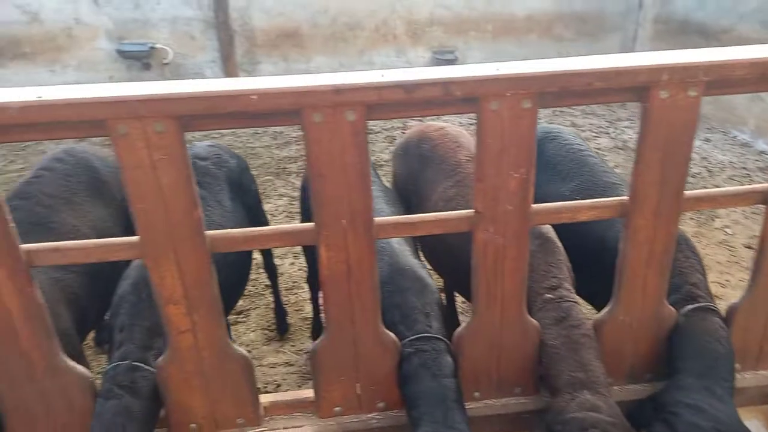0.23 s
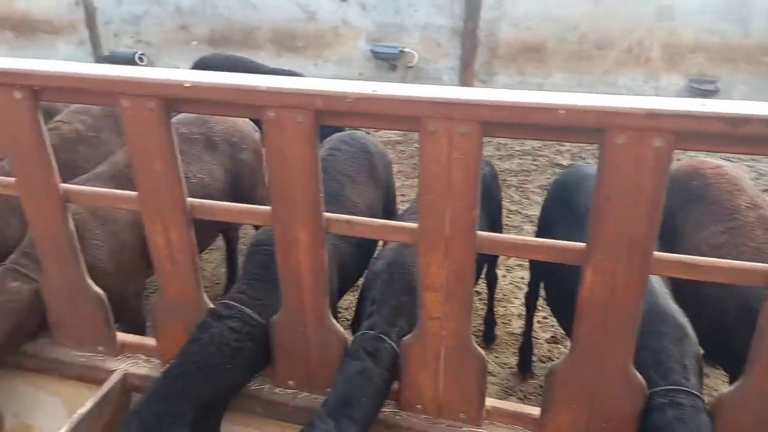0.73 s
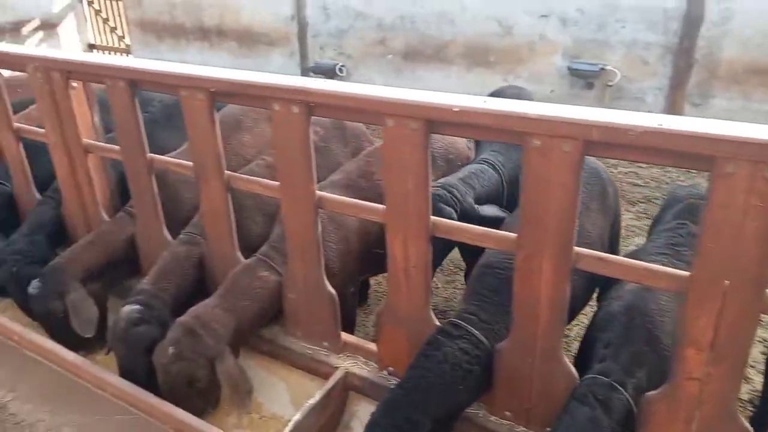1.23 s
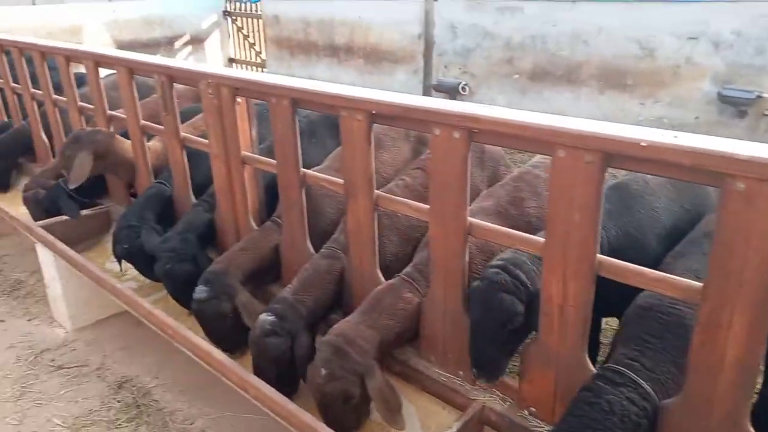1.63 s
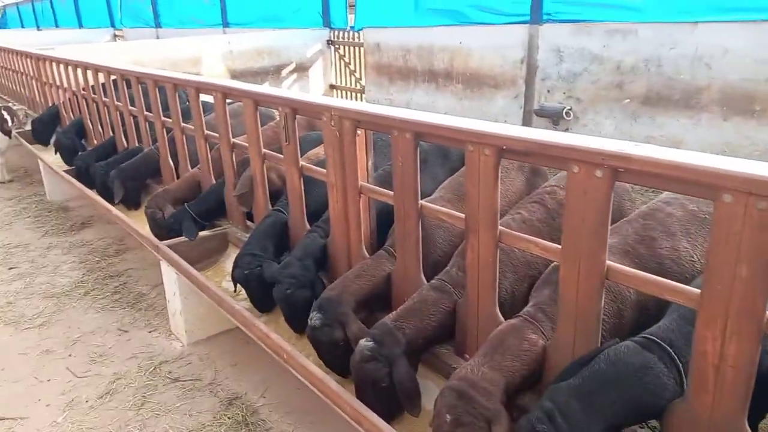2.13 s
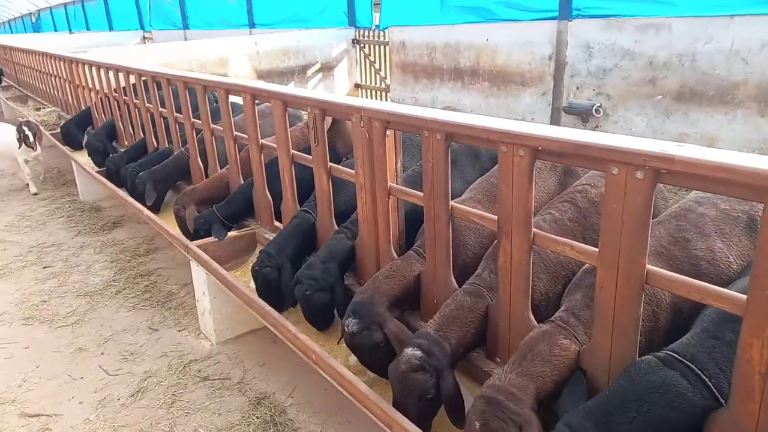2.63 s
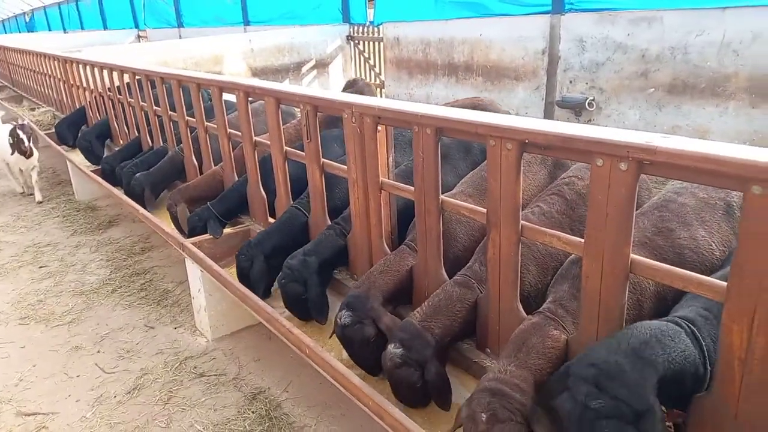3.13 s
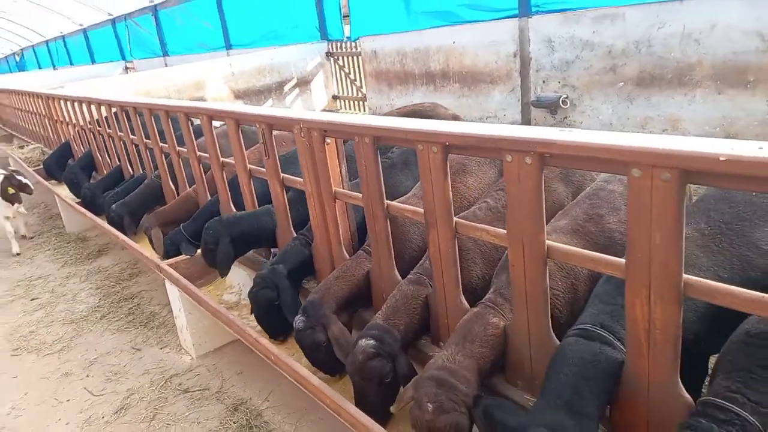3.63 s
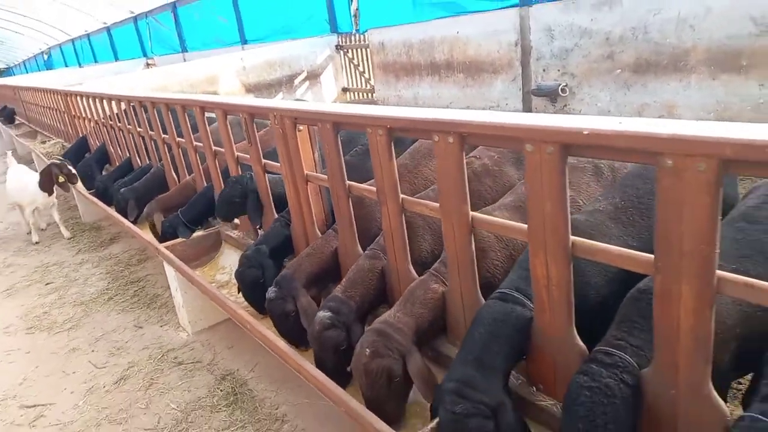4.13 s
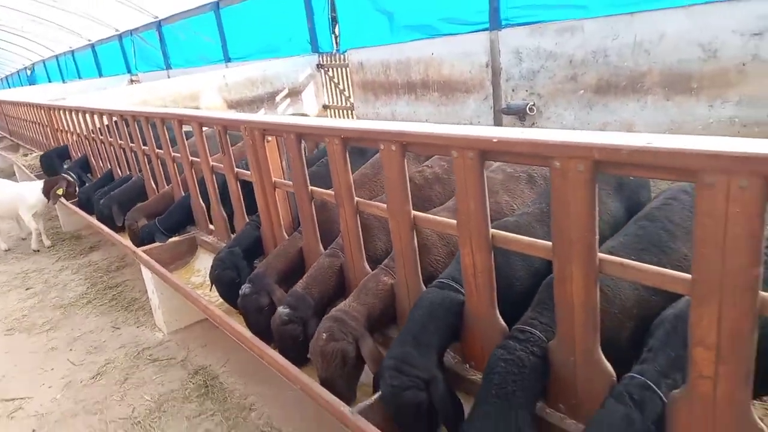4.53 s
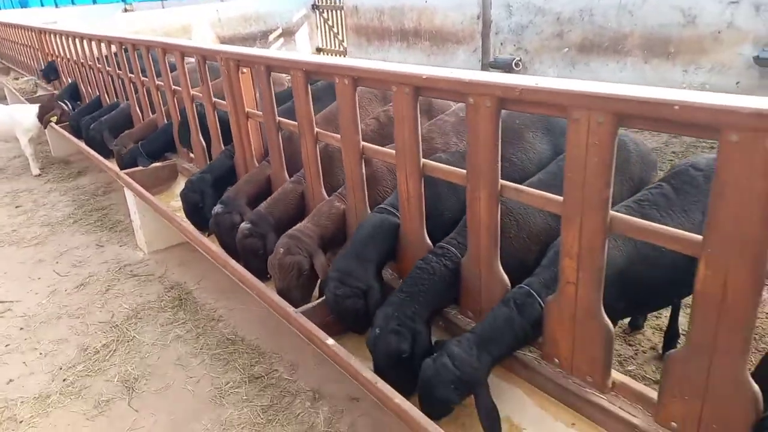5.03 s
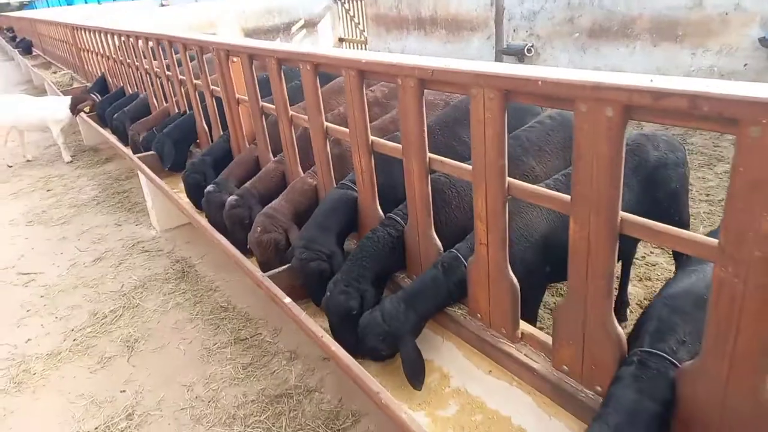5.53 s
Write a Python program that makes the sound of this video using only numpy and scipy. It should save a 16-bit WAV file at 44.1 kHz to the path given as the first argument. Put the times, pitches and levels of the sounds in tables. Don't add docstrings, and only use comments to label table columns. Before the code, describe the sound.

Feeding sheep in a shed: one strong rough bleat up close, softer higher bleats around it, birds chirping, planks knocking, hay rustling.

```python
import sys
import numpy as np
from scipy import signal
from scipy.fft import rfft, irfft
from scipy.io import wavfile
from scipy.ndimage import uniform_filter1d, map_coordinates

SR = 44100
rng = np.random.default_rng(int(sys.argv[2]) if len(sys.argv) > 2 else 0)


def to_linear_factor(level_db):
    exponent = np.asarray(level_db, float) / 20
    return 10 ** exponent


def generate_wav(signal):
    frames = np.transpose(np.atleast_2d(signal))
    scaled = np.clip(frames, -1, 1) * 32767
    pcm = np.round(scaled).astype(np.int16)
    wavfile.write(sys.argv[1], SR, pcm)


N = 254456


def unit(x):
    return x / np.sqrt(np.mean(x ** 2) + 1e-30)


def power_sum(*gains):
    return 10 * np.log10(sum(np.square(g) for g in gains))


def colour(x, table):
    hz, db = np.transpose(table)
    f = np.maximum(np.fft.rfftfreq(4096, 1 / SR), 1)
    cep = irfft(np.interp(np.log(f), np.log(hz), db) * np.log(10) / 20)
    cep[1:2048] *= 2
    cep[2049:] = 0
    response = irfft(np.exp(rfft(cep)))[:2048]
    return signal.fftconvolve(x, response)[:len(x)]


def band(x, lo_hz, hi_hz):
    return signal.sosfilt(signal.butter(3, [lo_hz, hi_hz], "band", fs=SR, output="sos"), x)


def split(x, edge_hz, kind="low"):
    return signal.sosfiltfilt(signal.butter(2, edge_hz, kind, fs=SR, output="sos"), x)


def walk(rate_hz, size):
    k = max(int(SR / rate_hz), 1)
    held = np.repeat(rng.standard_normal(size // k + 1), k)[:size]
    return 1.3 * uniform_filter1d(uniform_filter1d(held, k), k)


def read(table):
    s, *columns = np.transpose(table)
    i = np.arange(int(s[0] * SR), min(int(s[-1] * SR), N))
    after = i - i[0] + (i[0] == 0) * SR
    left = i[-1] - i + (i[-1] > N - 99) * SR
    fade = np.clip(np.minimum(after, left) / (.015 * SR), 0, 1)
    return i[0], [np.interp(i / SR, s, c) for c in columns], fade


def add(out, start, x, lag, pan_db, shade_db=0., turn_db=0.):
    x = np.pad(x, (0, 512))
    f = np.fft.rfftfreq(len(x), 1 / SR)
    shade = np.exp(-np.log(np.maximum(f, 1) / 1750) ** 2 / .3)
    tilt = to_linear_factor((pan_db + shade_db * shade) / 2)
    ports = rfft(x) * np.array([tilt, np.exp(-2j * np.pi * f * lag / SR) / tilt])
    heard = irfft(ports, len(x)) * to_linear_factor(np.outer([.5, -.5], turn_db))
    out[:, start:start + len(x)] += heard[:, :N - start]


def effort(call):
    _, _, db, chest_db = np.transpose(call)
    db = db + power_sum(0.96, to_linear_factor(chest_db))
    rough = np.minimum(.03 + .03 * (db.max() - db), .22)
    return np.column_stack([call, rough])


def burst(s, held_s, hz, db, chest_db, rough, attack_s, release_s, glide_hz_s):
    after = np.cumsum([0, attack_s, max(held_s - attack_s, .01), release_s])
    level_db = db + np.array([-12.0, 1.0, -9.5, -33.0])
    return np.transpose([s + after, hz + glide_hz_s * after, level_db, np.full(4, chest_db), np.full(4, rough)])


def voice(out, call, throat, lag, pan_db, shade_db, split_hz=1000, breath=.5, half_db=0., flutter_db=1.5,
          rasp=.8, tire=0., gape=0., wobble_db=.5, quaver_db=0., husk=0., mouth_db=0., jolts=(), turn=((0, 0),)):
    husk_hz, quaver_hz = 2900, 8.6
    under_lift, over_lift = 1.23, 2
    jolt_rest_db, jolt_takes = -3, .3
    start, (hz, db, chest_db, rough), fade = read(call)
    size = len(hz)
    late = np.clip(np.linspace(-7, 3, size), 0, 1)
    rough = np.clip(rough + tire * late, .035, 1)

    phase = np.cumsum(hz * (1 + .03 * rough * walk(150, size))) / SR
    cycles = np.arange(1, int(phase[-1]))
    at = np.interp(cycles, phase, np.arange(size))
    uneven_db = 8 * rough[at.astype(int)] * rng.standard_normal(len(at))
    strength = to_linear_factor(uneven_db + half_db * (cycles % 2))
    taps = np.clip(at.astype(int)[:, None] + np.arange(-7, 9), 0, size - 1)
    shape = strength[:, None] * np.sinc(taps - at[:, None]) * np.hanning(18)[1:-1]
    pulses = unit(np.bincount(taps.ravel(), shape.ravel(), size))

    air = unit(rng.standard_normal(size) * np.exp(-(phase % 1) / 0.4))
    pulses = pulses + husk * split(air - pulses, husk_hz, "high")
    scrape = band(rng.standard_normal(size), 1080, 11000)
    sound = colour(pulses + breath * rough * air + rasp * scrape, throat)
    sound = band(sound, 70, 7000)
    chest = split(sound, split_hz)
    mouth = unit(sound - chest)

    nasal = split(chest, [330, 470], "band")
    under = split(chest, [230, 310], "band")
    over = split(chest, [650, 900], "band")
    jaw = gape * np.clip(4 * late, 0, 1)
    chest = chest + jaw * (under_lift * under + over_lift * over - nasal)

    lips = split(mouth, 1850)
    teeth = split(mouth, 2400, "high")
    t = (start + np.arange(size + 512)) / SR
    jolt_db = jolt_rest_db * bool(jolts)
    for s, size_db, half_s in jolts:
        jolt_db = jolt_db + size_db * np.exp(-((t[:size] - s) / half_s) ** 2)
    parts = [(lips, -jolt_takes), (mouth - lips - teeth, 1), (teeth, 0)]
    mouth = sum(part * to_linear_factor(share * jolt_db + flutter_db * walk(55, size)) for part, share in parts)

    db = db + quaver_db * np.cos(2 * np.pi * quaver_hz * np.arange(size) / SR)
    chest = unit(chest) * to_linear_factor(chest_db + wobble_db * walk(31.6, size))
    add(out, start, chest * to_linear_factor(db) * fade, lag, pan_db, shade_db, np.interp(t, *np.transpose(turn)))
    add(out, start, mouth * to_linear_factor(db + mouth_db) * fade, lag, pan_db, shade_db)


# time in s, pitch in Hz, level in dB, chest against mouth in dB.
EWE_CALLS = [
    [(0.0, 146.4, -26.5, 0), (0.04, 146.3, -33, -4), (0.1, 141.7, -35.5, 1.5), (0.17, 141.2, -34.5, 2),
     (0.25, 134.6, -39.5, -3), (0.37, 130.6, -56.5, -28)],
    [(1.55, 126.7, -70, -13.5), (1.63, 128.1, -37.5, -17), (1.72, 135.9, -22.5, -8.5),
     (1.784, 143.5, -23, -1), (1.916, 148, -21.5, -4), (2.156, 142.2, -25, -3), (2.205, 138.4, -26, 4.5),
     (2.285, 132.9, -28, -4), (2.41, 128.2, -36.5, -17.5)],
]
# time in s, pitch in Hz, level in dB, chest against mouth in dB.
LAMB_CALLS = [
    [(0.7, 185, -72, 1.5), (0.79, 192.5, -68, 5.5), (0.846, 197.4, -58, 1), (0.96, 195.6, -43, -14),
     (1.05, 193.3, -43, -9), (1.115, 187.5, -44.5, -18), (1.26, 184.7, -48, -13), (1.39, 181, -58, -5),
     (1.5, 182, -70.5, -26)],
    [(2.38, 194.2, -37, -34), (2.5, 195.6, -40, -15.5), (2.66, 197.8, -43.5, -4), (2.77, 194.3, -42, -41),
     (2.93, 189.8, -45, -14.5), (3.09, 180.2, -48.5, -7.5), (3.21, 186.4, -60.5, -2.5),
     (3.46, 182.8, -75.5, -3)],
]
# start in s, hold in s, pitch in Hz, level in dB.
COUGHS = [
    (4.71, 0.14, 125, -35.5),
    (4.815, 0.07, 121.8, -35),
    (5.73, 0.077, 115, -41.5),
]
# start in s, hold in s, pitch in Hz, level in dB.
COUGH_GULPS = [
    (4.748, 0.033, 123.1, -56),
    (4.832, 0.046, 121.3, -51),
]
# start in s, hold in s, pitch in Hz, level in dB, chest in dB.
GULPS = [
    (2.288, 0.021, 132.3, -37, 11.5),
    (2.322, 0.015, 124.6, -42.5, 14.5),
    (2.385, 0.035, 128.8, -59, 7.5),
]
# start in s, hold in s, pitch in Hz, level in dB, chest in
# dB.
GRUNTS = [
    (1.55, 0.41, 121.5, -54, -7.5),
    (4.385, 0.16, 106.6, -67, -1),
    (4.552, 0.079, 124.7, -55.5, -7),
    (4.639, 0.069, 126, -51, -18),
    (5.149, 0.22, 96, -86, 25),
    (5.63, 0.31, 113.5, -57, -13),
]
# start in s, hold in s, pitch in Hz, level in dB, chest against mouth in dB.
FAR_LAMB = (4.5, 1.14, 192.5, -65.5, 0.5)
# frequency in Hz, gain in dB.
EWE_THROAT_FIRST = [(60, 0), (130, -15), (280, -5.5), (430, 7.5), (590, 15), (750, -6.5), (1000, -2.5),
                    (1180, -1.5), (1400, 0), (1720, -4.5), (2000, 8), (2200, 0), (2450, 1), (2750, -8.5),
                    (3000, -14.5), (4300, -11), (6700, -18), (7500, -65)]
EWE_THROAT = [(130, -15.5), (279, -18), (430, -6.5), (594, 4), (715, -23.5), (870, -20.5), (1100, -19),
              (1180, -17), (1310, -8), (1450, -2.5), (1600, -14), (1800, -14), (2020, -8.5), (2170, 2),
              (2320, -11), (2560, -8), (2800, -13.5), (3080, -22), (3480, -18.5), (4050, -28), (4450, -25),
              (4800, -20), (5250, -32.5), (6000, -23.5), (7300, -38.5)]
LAMB_THROAT_FIRST = [(150, -38), (380, -5.5), (580, 0.5), (760, -16), (960, -41.5), (1170, -25), (1340, 3),
                     (1550, 0.5), (1800, -25), (2200, 13), (2500, -2), (2750, 7.5), (3000, -10),
                     (3500, -2.5), (4600, -23), (7000, -27), (7600, -57)]
LAMB_THROAT = [(200, -54), (560, -25.5), (780, -3), (980, -16), (1200, -29), (1560, -1), (1800, -13),
               (2150, 0), (2500, -6), (2750, -16.5), (3300, -33.5), (4200, -37), (7000, -57), (7600, -74)]
COUGH_THROAT = [(300, -45), (470, -16), (610, 2), (780, -8), (1170, -16.5), (1560, -1), (1850, -11),
                (2040, -1), (2160, 3.5), (2300, -5), (2650, -9.5), (3290, -33), (6700, -54.5), (7500, -42)]
GRUNT_THROAT = [(60, 20), (120, 24), (260, 6.5), (400, -11), (700, -29), (1500, -44)]
# time in s, size in dB, half-length in s.
JOLTS = [(1.748, 5, .016), (1.804, 9, .012), (1.9, -8, .018), (1.942, 3, .022), (2.03, 6, .012),
         (2.075, 14, .02), (2.118, 1, .014), (2.152, 16, .01), (2.185, 6, .014), (2.24, 5, .014),
         (2.305, 18, .012)]
# time in s, left over right in dB.
HEAD_TURN = [(1.6, -13), (1.75, 0), (1.8, -3), (1.88, -1), (1.97, -0.5), (2.07, 1.5), (2.19, -2.5),
             (2.27, -2), (2.32, -2)]


def sheep():
    out = np.zeros((2, N))
    voice(out, effort(EWE_CALLS[0]), EWE_THROAT_FIRST, 13.1, 0.84, -8, half_db=-1.5, breath=1.2, rasp=.55,
          husk=.4, flutter_db=2, mouth_db=1)
    voice(out, effort(EWE_CALLS[1]), EWE_THROAT, 21, 1.5, -7, half_db=-.2, breath=1, rasp=.2, flutter_db=1,
          tire=.07, gape=.92, husk=.45, mouth_db=-3.5, jolts=JOLTS, turn=HEAD_TURN)
    for row in GULPS:
        call = burst(*row, .3, attack_s=.01, release_s=.03, glide_hz_s=-60)
        voice(out, call, EWE_THROAT, 21, 1.5, -7, split_hz=800)
    voice(out, effort(LAMB_CALLS[0]), LAMB_THROAT_FIRST, 22, -1.2, -4, breath=1.5, rasp=.2, flutter_db=1.4,
          wobble_db=3.5, tire=.2, husk=.4)
    voice(out, effort(LAMB_CALLS[1]), LAMB_THROAT, 9.5, -1.5, -5, rasp=.15, flutter_db=2, wobble_db=3,
          tire=.4, quaver_db=2.8)
    for row in COUGHS:
        call = burst(*row, -19, .27, attack_s=.036, release_s=.22, glide_hz_s=-20)
        voice(out, call, COUGH_THROAT, 12.4, -1.1, -4, breath=5, rasp=1.2, mouth_db=-2)
    for row in COUGH_GULPS:
        call = burst(*row, 10, .12, attack_s=.012, release_s=.05, glide_hz_s=-20)
        voice(out, call, COUGH_THROAT, 12.4, -1.1, -4, split_hz=800)
    call = burst(*FAR_LAMB, .55, attack_s=.12, release_s=.1, glide_hz_s=-8)
    voice(out, call, LAMB_THROAT, 9.5, -1.5, -5, breath=3, wobble_db=3)
    for row in GRUNTS:
        call = burst(*row, 0.26, attack_s=0.035, release_s=0.046, glide_hz_s=31.4)
        voice(out, call, GRUNT_THROAT, 18.0, -0.47, 0, split_hz=390)
    return out


# time in s, half-length in s, level in dB.
PUFFS = [(0.044, 0.28, -53), (0.714, 0.022, -69), (0.93, .1, -64.5), (1.09, 0.11, -67.5),
         (1.308, .08, -64.5), (1.613, 0.12, -59), (2.57, 0.28, -71), (3.063, 0.12, -59),
         (3.388, 0.074, -66.5), (3.589, 0.1, -60.5), (3.933, 0.27, -65.5), (4.19, 0.063, -67),
         (4.358, 0.068, -62.5), (4.746, 0.1, -65.5), (4.918, 0.14, -56), (5.25, 0.062, -63.5),
         (5.442, 0.044, -63.5), (5.693, 0.13, -62.5)]


def puffs():
    t = np.arange(N) / SR
    swells = [to_linear_factor(db) * np.exp(-((t - s) / half_s) ** 2) for s, half_s, db in PUFFS]
    return np.sqrt(sum(np.square(swell) for swell in swells))


# time in s, level over usual in dB.
RUSTLE_LEVEL = [(0, 77), (0.371, -13), (.62, -18), (.72, -4), (1.1, -6.5), (1.48, -9), (2.6, -8), (3.358, -12),
                (3.66, -6), (4.129, -13), (4.64, -0.5), (5.03, -5), (5.62, -13.5), (5.77, 57)]
# frequency in Hz, density in dB per Hz.
RUSTLE = [(18, -105), (30, -62.5), (64, -10.5), (204, -18), (250, -14), (361, -16), (560, -21.5),
          (783, -22), (1260, -25.5), (1420, -14), (2340, -13), (2940, -19.5), (7000, -26), (9100, -101.5),
          (15400, -120)]
# usual level in dB, share of the level curve, level under a bleat in dB, pan in dB.
HERD_PARTS = [
    (-59.5, 0.91, -27.5, -0.1),
    (-64, 0.18, -5, -9),
    (-67.5, 0.013, -15.5, -0.4),
]
HERD_EDGES_HZ = [1250, 3000]
HERD_TOP_DB = [-56, -57, -58]


def herd(loud):
    swing_db = np.interp(np.arange(N) / SR, *np.transpose(RUSTLE_LEVEL))
    parts = np.zeros((3, 2, N))
    mid, side = (colour(rng.standard_normal(N), RUSTLE) for _ in range(2))
    for hz in 35 * 2 ** np.arange(0, 7.8, 1 / 3):
        lo_hz, hi_hz = hz / 2 ** (1 / 6), hz * 2 ** (1 / 6)
        apart = np.clip(hz / 2200, .4, 1)
        depth_db = np.clip(3 - hz / 1500, .8, 3)
        flicker = to_linear_factor(depth_db * (.6 * walk(4, N) + .8 * walk(14, N)))
        ports = band(mid, lo_hz, hi_hz) + apart * band(side, lo_hz, hi_hz) * np.array([[1], [-1]])
        parts[np.searchsorted(HERD_EDGES_HZ, hz)] += flicker * ports
    out = np.zeros((2, N))
    chaff = [0, 0, to_linear_factor(-2.5) * puffs()]
    for part, row, top_db, puff in zip(parts, HERD_PARTS, HERD_TOP_DB, chaff):
        db, share, under_db, pan_db = row
        db = np.minimum(power_sum(to_linear_factor(db + share * swing_db), loud * to_linear_factor(under_db), puff), top_db)
        out += part / np.std(part.mean(axis=0)) * to_linear_factor(db + np.array([[pan_db], [-pan_db]]) / 2)
    return out


# frequency in Hz, density in dB per Hz.
HISS_COLOUR = [(6800, -3), (7300, -3), (8300, -1), (10000, 2), (12000, 3.5), (14000, -0.5), (15500, -1.5)]


def hiss(loud):
    rest_db, breath_db = -70, -32
    db = power_sum(to_linear_factor(rest_db), puffs(), loud * to_linear_factor(breath_db))
    db = db + 2.4 * walk(9.8, N) + 2.0 * walk(35, N)
    return np.array([unit(colour(rng.standard_normal(N), HISS_COLOUR)) * to_linear_factor(db + pan_db) for pan_db in (-.8, .8)])


def note(s, slide_s, from_hz, to_hz, db, held_s):
    edge_db = -6
    return [(s, from_hz, db + edge_db),
            (s + .4 * slide_s, from_hz + .4 * (to_hz - from_hz), db),
            (s + slide_s, to_hz, db + edge_db * (held_s < .01)),
            (s + slide_s + held_s, to_hz, db + edge_db)]


# time in s, pitch in Hz, level in dB.
PHRASES = [
    [(4.005, 2290, -64), (4.04, 2380, -70), (4.065, 2630, -68), (4.098, 2625, -65.5), (4.112, 2370, -68),
     (4.17, 2385, -59.5), (4.22, 2370, -67), (4.295, 2350, -74)],
    [(4.34, 2390, -62), (4.385, 2370, -60), (4.425, 2330, -64), (4.44, 2120, -64.5), (4.468, 1945, -66),
     (4.5, 1935, -66), (4.53, 1990, -62), (4.565, 2060, -66)],
    [(5.175, 2190, -62), (5.24, 2225, -66), (5.29, 2250, -56), (5.36, 2255, -74), (5.385, 2260, -74),
     (5.42, 2250, -69), (5.48, 2220, -71)],
    [(0.655, 3560, -64), (0.68, 3600, -66), (0.77, 3880, -67), (0.84, 4200, -68), (0.9, 4680, -65),
     (0.93, 4780, -69), (0.99, 4800, -74)],
]
# start in s, length in s, from in Hz, to in Hz, level in dB.
WHISTLES = [
    (0.588, 0.039, 3730, 3310, -67),
    (3.72, 0.16, 1780, 1788, -66.5),
    (5.094, 0.032, 2920, 2500, -62.5),
    (5.494, 0.098, 5160, 5250, -61),
    (5.612, .06, 5200, 5300, -72),
    (5.655, 0.14, 2200, 2273, -58),
]
# start in s, slide in s, from in Hz, to in Hz, level in dB.
SLIDES = [
    (1.47, 0.15, 4270, 5950, -60.5),
    (4.299, 0.13, 5600, 6980, -76),
    (5.285, 0.12, 5200, 6960, -70.5),
    (5.39, 0.125, 3860, 5240, -77),
    (5.695, 0.067, 3880, 4890, -69.5),
]
# start in s, length in s, from in Hz, to in Hz, level in dB.
CHIRPS = [(0.429, 0.038, 6700, 6100, -57.5), (0.556, 0.012, 4600, 4740, -53.5),
          (0.569, 0.049, 4860, 4770, -58), (1.076, 0.051, 6780, 5970, -55.5),
          (1.299, 0.075, 6683, 6480, -56.5), (2.778, 0.081, 4280, 3720, -56),
          (3.046, 0.13, 3500, 4420, -56.5), (3.235, 0.036, 3830, 4093, -53),
          (3.294, 0.02, 4490, 4130, -49.5), (3.334, 0.033, 4560, 3940, -52),
          (3.362, 0.048, 4160, 3920, -57.5), (3.585, 0.029, 4500, 4060, -51),
          (3.617, 0.011, 4237, 4175, -41.5), (3.634, 0.063, 4240, 4190, -54), (3.7, 0.12, 4180, 4100, -62),
          (3.781, 0.078, 4340, 4320, -55.5), (3.794, 0.057, 3820, 3475, -56.5),
          (5.751, 0.027, 1900, 1810, -44.5)]


def birds():
    out = np.zeros((2, N))
    whistles = [note(*row, .001) for row in WHISTLES]
    slides = [note(*row, .07) for row in SLIDES]
    for table in PHRASES + whistles + slides:
        start, (hz, db), fade = read(table)
        husky = np.clip(np.abs(np.gradient(hz)) * SR / 10000, .15, 1)
        pitch_hz = hz * (1 + .02 * husky * walk(300, len(hz)))
        level_db = db + 3 + 4 * husky + (2 + 1.5 * husky) * walk(80, len(hz))
        tone = np.sin(2 * np.pi * np.cumsum(pitch_hz) / SR) * to_linear_factor(level_db)
        add(out, start, tone * fade, 1, -3)
    for s, length_s, from_hz, to_hz, db in CHIRPS:
        x = np.arange(int(length_s * SR)) / (length_s * SR)
        hz = (from_hz + (to_hz - from_hz) * x) * (1 + .055 * walk(600, len(x)))
        envelope = np.minimum(6 * x, 1) * (1 - x) ** 0.2
        tone = np.sin(2 * np.pi * np.cumsum(hz) / SR) * envelope * to_linear_factor(db + 2 * walk(256, len(x)))
        add(out, int(s * SR), tone, 1, 0)
    return out


# time in s, peak in dB, mode in Hz, t60 in s.
KNOCKS = [(0.714, -43, 436, 0.018), (0.804, -47.5, 562, 0.11), (0.842, -38, 393, 0.033),
          (2.645, -45, 264, 0.052), (2.826, -47, 197, 0.06), (3.533, -45.5, 152, 0.15),
          (3.598, -44.5, 308, 0.13), (3.738, -52, 277, 0.089), (4.406, -41.5, 284, 0.068),
          (5.226, -48, 233, 0.029), (5.439, -46.5, 314, 0.048)]
# time in s, peak in dB, mode in Hz, t60 in s.
TICKS = [
    (0.84, -39, 4200, 0.03),
    (3.7384, -40, 3100, 0.02),
    (5.2187, -48, 2000, 0.012),
    (5.2187, -46, 5000, .01),
    (1.023, -40, 3800, .01),
    (1.663, -25, 2100, .02),
    (1.663, -32, 1350, .02),
    (5.658, -50, 3100, .012),
    (5.68, -52, 6300, .01),
]


def knocks():
    out = np.zeros((2, N))
    t = np.arange(int(.2 * SR)) / SR
    for s, db, hz, t60_s in KNOCKS + TICKS:
        plank = hz < 1000
        ring = np.sin(2 * np.pi * hz * t) + plank * 0.88 * np.sin(2 * np.pi * 0.744 * hz * t)
        envelope = (1 - np.exp(-t * hz / .8)) * 1000 ** (-t / t60_s)
        add(out, int(s * SR), .7 * to_linear_factor(db) * ring * envelope, 4 * plank, -1.5)
    return out


def shed(dry, spread_s, wet_db):
    far_t60_s, near_t60_s, near_lift = .38, .13, 2.5
    size = 2 ** 19
    t = np.arange(int(.7 * SR)) / SR
    decay = 1000 ** (-t / far_t60_s) + near_lift * 1000 ** (-t / near_t60_s)
    tail = band(rng.standard_normal((2, len(t))), 750, 7000) * decay * (t > .004)
    tail /= np.sqrt(np.sum(tail ** 2, axis=1, keepdims=True))
    f = np.fft.rfftfreq(size, 1 / SR)
    knots = np.arange(0, SR / 2, 120)
    delay_s = [np.interp(f, knots, spread_s * rng.random(len(knots)) * (knots > 1600)) for _ in range(2)]
    scatter = np.exp(-2j * np.pi * np.cumsum(delay_s, axis=1) * f[1])
    return irfft(rfft(dry, size) * (scatter + to_linear_factor(wet_db) * rfft(tail, size)))[:, :N]


def sway(x):
    sway_samples, sway_hz, from_hz = 2, 9, 1200
    treble = split(x, from_hz, "high")
    moved = [map_coordinates(port, [np.arange(N) + sway_samples * walk(sway_hz, N)], mode="mirror")
             for port in treble]
    return x - treble + moved


def scene():
    calls = sheep()
    loud = np.sqrt(uniform_filter1d(np.mean(calls ** 2, axis=0), int(.06 * SR)).clip(0))
    near = sway(shed(calls, .004, -4)) + shed(knocks(), 0, -5)
    far = shed(birds(), 0, -1)
    return near + far + herd(loud) + hiss(loud)


# frequency in Hz, share.
DROPPED = [(0, 0), (2200, .03), (2600, .13), (5000, .2), (6500, .24), (7000, 1.1), (8300, .9), (9600, .55),
           (11000, .35), (12500, .45), (14000, .85), (15500, 1.2)]


def thin(x, hop=1024, offset=198):
    n, k = np.arange(2 * hop)[:, None], np.arange(hop)
    window = np.sin(np.pi * (n + .5) / (2 * hop))
    basis = window * np.cos(np.pi / hop * (n + .5 + hop / 2) * (k + .5)) * np.sqrt(2 / hop)
    blocks = np.pad([x[0] + x[1], x[0] - x[1]], ((0, 0), (2 * hop - offset, 3 * hop)))
    blocks = blocks[:, :blocks.shape[1] // hop * hop].reshape(2, -1, hop)
    lines = np.concatenate([blocks[:, :-1], blocks[:, 1:]], axis=2) @ basis
    local = np.sqrt(uniform_filter1d(lines ** 2, 32, axis=2))
    patch = np.repeat(np.exp(.75 * rng.standard_normal(lines.shape[1:])[:, ::32]), 32, axis=1)
    power_db = 10 * np.log10(np.mean(lines[0] ** 2, axis=1, keepdims=True) + 1e-12)
    strictness = np.interp(power_db, [-45, -20], [.75, 1.5])
    share = np.interp(k * SR / (2 * hop), *np.transpose(DROPPED))
    lines *= np.abs(lines) > local * patch * strictness * share
    frames = lines @ basis.T
    joined = (frames[:, 1:, :hop] + frames[:, :-1, hop:]).reshape(2, -1)
    mid, side = joined[:, hop - offset:][:, :N] / 2
    return np.array([mid + side, mid - side])


def roll_off(x):
    return signal.sosfilt(signal.butter(12, 15760, fs=SR, output="sos"), x)


def record(dry):
    mix = thin(dry)
    return roll_off(mix)


dry = scene()
out = record(dry)
generate_wav(out)
```